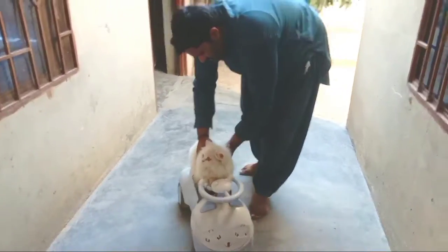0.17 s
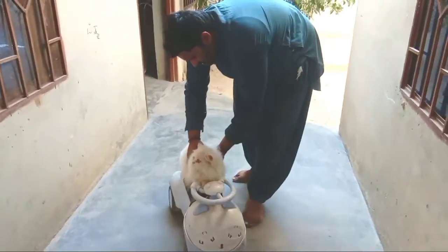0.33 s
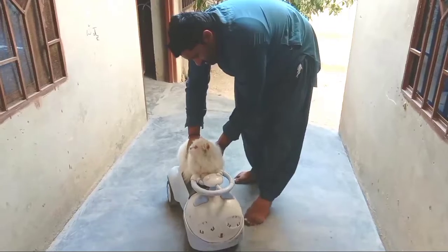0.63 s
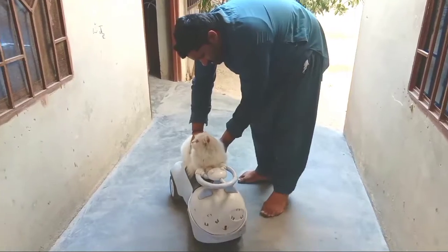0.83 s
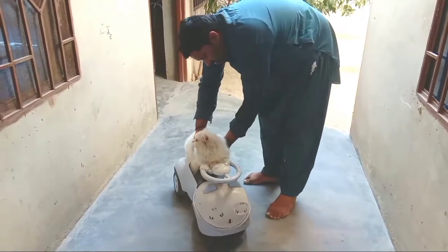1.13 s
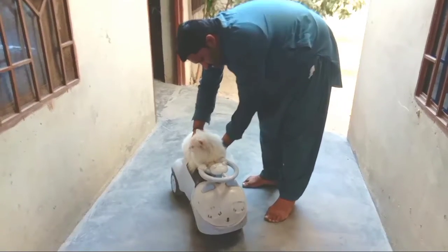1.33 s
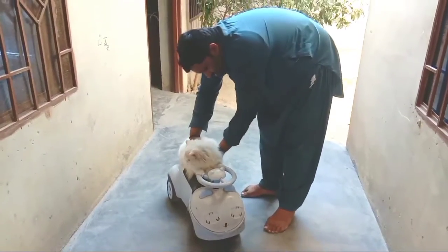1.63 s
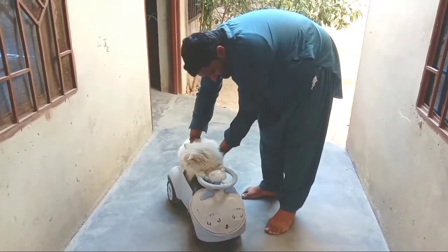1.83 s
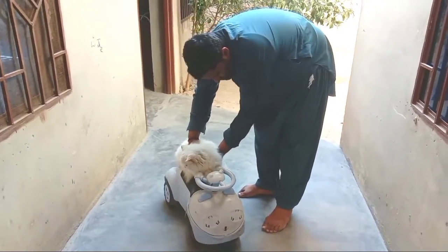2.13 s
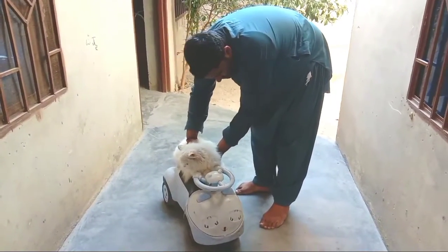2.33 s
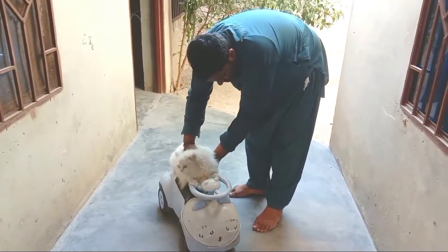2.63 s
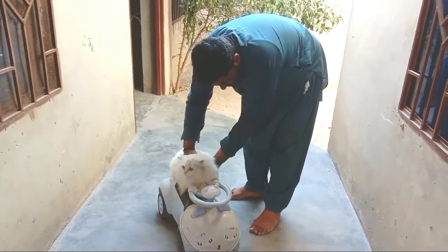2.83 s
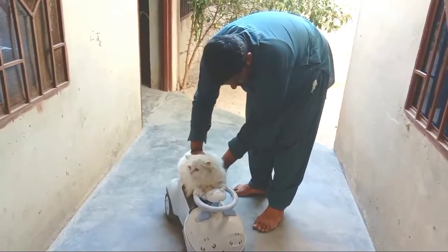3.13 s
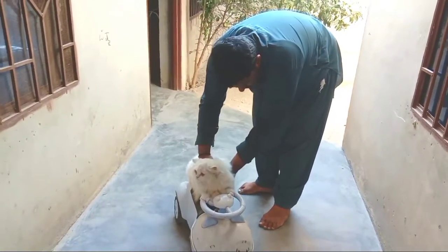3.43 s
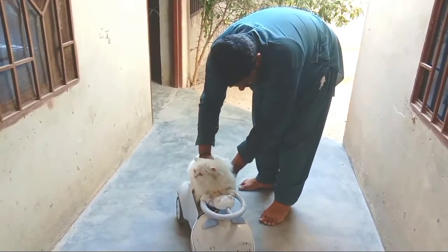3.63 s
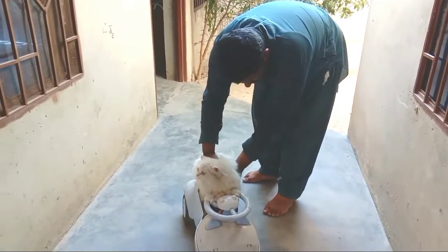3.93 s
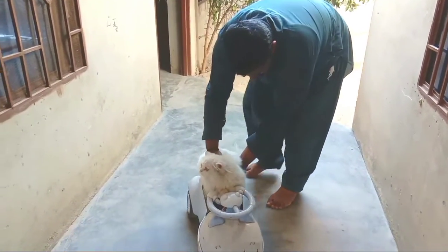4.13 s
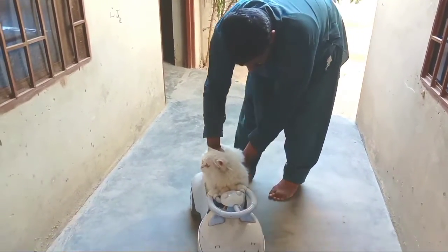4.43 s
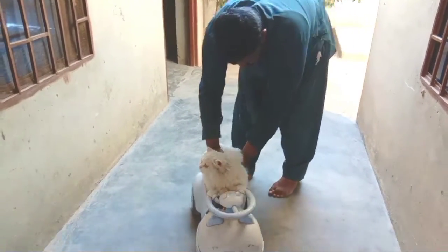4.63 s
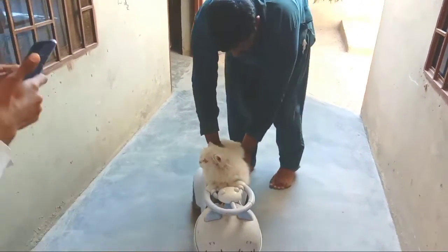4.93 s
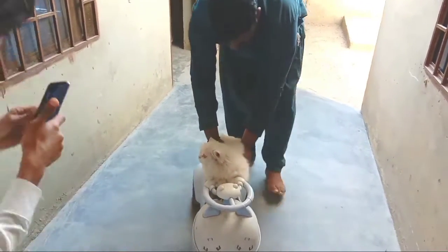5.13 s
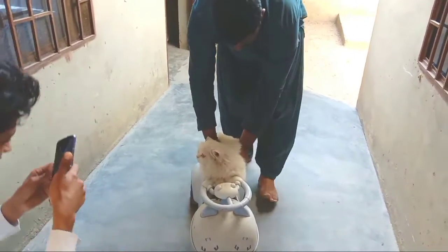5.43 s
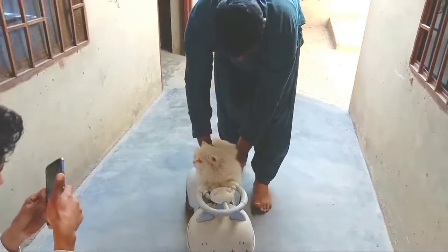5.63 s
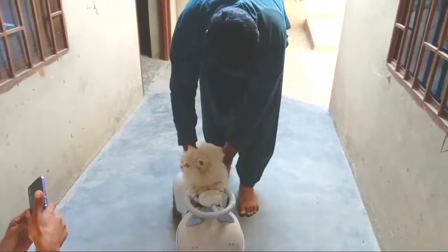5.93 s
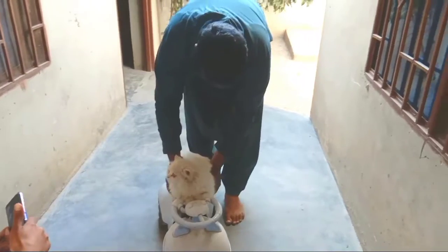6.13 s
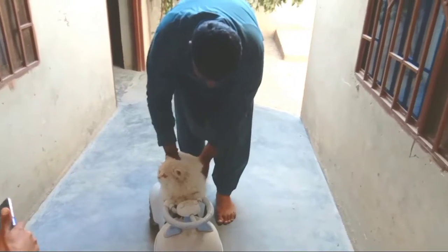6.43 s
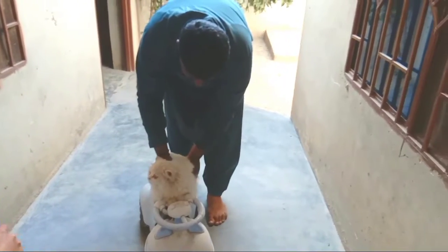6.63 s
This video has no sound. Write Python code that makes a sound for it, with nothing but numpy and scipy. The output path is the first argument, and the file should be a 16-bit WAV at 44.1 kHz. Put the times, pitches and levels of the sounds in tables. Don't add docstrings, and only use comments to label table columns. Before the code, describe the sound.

In a narrow hard-walled corridor, a hollow plastic ride-on toy is nudged over gritty concrete. The first second and a half is loudest, with scrapes, sharp snaps and hollow knocks; it nearly stops around two seconds, then resumes in softer rattling bursts with little axle squeaks. Close to the end a hand bumps and rubs the phone picking up the sound.

```python
import sys
import numpy as np
from scipy import signal
from scipy.io import wavfile
from scipy.ndimage import uniform_filter1d

SR = 44100
rng = np.random.default_rng(int(sys.argv[2]) if len(sys.argv) > 2 else 0)


def linear_from_db(decibels):
    return 10 ** (np.asarray(decibels, float) / 20)


def bounce(signal):
    frames = np.transpose(np.atleast_2d(signal))
    limited = np.clip(frames, -1, 1)
    pcm = np.round(limited * 32767).astype(np.int16)
    wavfile.write(sys.argv[1], SR, pcm)


N = 298557

# frequency in Hz, level in dB per Hz.
AIR_SPECTRUM = [(15, -33), (25, -15), (44, -12), (96, -7.5), (183, -8.5), (434, -14), (923, -19),
                (1180, -14.5), (1270, -6), (1380, -12.5), (3550, -19), (7960, -43), (15600, -41)]
AIR_DB = -69.5

# start in seconds, length in seconds, speed in dB,
# shell ring in dB over speed, weight on the floor in dB over speed.
ROLLS = [(-.1, 0.27, -44.5, -10, -5.5), (0.099, 0.19, -42, -13, -4.5), (0.27, 0.273, -54.5, -12.5, 3.5),
         (0.548, 0.18, -49.5, -9.5, 2), (0.69, 0.38, -48.5, -7.5, -3), (1.034, 0.29, -52.5, -10, 0.5),
         (1.199, 0.28, -54.5, -9, -1), (1.48, 0.11, -56.5, -2.5, -2.5), (1.628, 0.22, -62.5, 3, 7),
         (2.055, 0.26, -85, 14.5, -6.5), (2.393, 0.091, -83, -6, 20.5), (2.621, 0.16, -59.5, -0.5, -7),
         (2.732, 0.22, -62.5, 7, 10), (2.958, 0.28, -59.5, -2, 5), (3.244, 0.29, -58.5, -7, 5),
         (3.5, 0.635, -66, -3.5, 5), (4.08, 0.452, -59, 1, 0), (4.5, 0.3, -58.5, -2, -0.5),
         (4.744, 0.51, -57, -2, -1), (5.061, 0.33, -54.5, -7, -7.5), (5.597, 0.27, -73.5, 5.5, 5),
         (5.902, 0.19, -70, 2.5, 2), (6.009, 0.23, -64.5, 9, 5), (6.457, 0.15, -76, -1, 14)]
# start in seconds, length in seconds, force in dB,
# fine grit in dB over force.
SKIDS = [(0.087, 0.042, -31, -10), (0.123, 0.26, -53, -31), (0.727, 0.026, -45.5, -43),
         (0.81, 0.19, -42.5, -52), (.98, 0.023, -62, -39), (1.106, 0.033, -78, -34),
         (1.201, 0.046, -45.5, -39), (1.329, 0.066, -51, -32), (2.221, 0.013, -70.5, -32),
         (2.53, 0.043, -71.5, -17), (2.726, 0.078, -52, -38), (2.953, 0.15, -56, -11),
         (3.585, 0.02, -68, -38), (4.133, 0.097, -52.5, -30), (4.323, 0.13, -52.5, -13),
         (4.518, 0.11, -56.5, -12), (4.861, 0.16, -56, -14), (5.095, 0.084, -49, -16),
         (5.215, 0.14, -55.5, -11), (5.33, 0.037, -55.5, -9), (5.436, 0.041, -59.5, -29),
         (6.033, 0.093, -55.5, -14), (6.133, 0.066, -77, -30)]
# frequency in Hz, width in Hz, level in dB.
WHEEL_MODES = [(2800, 120, -4), (3560, 120, 7.5), (3960, 65, -1.5), (5250, 250, -25.5), (5850, 270, -15),
               (7100, 140, -24)]
# frequency in Hz, level in dB per Hz.
SCRAPE_SPECTRUM = [(500, -27), (1000, -7), (1600, -6.5), (2200, -1.5), (3600, -1.5), (4550, -6),
                   (5500, -2.5), (6200, -14.5), (6900, -12), (8100, -26), (10000, -24.5), (13400, -40),
                   (15000, -40.5), (15600, -41)]
# frequency in Hz, level in dB per Hz.
RUMBLE_SPECTRUM = [(15, -57.5), (25, -15.5), (118, 0), (184, -3.5), (325, 0.5), (393, -2), (425, -1.5),
                   (717, -13), (1100, -16.5), (1430, -33.5), (2420, -120)]
# frequency in Hz, width in Hz, level in dB.
SHELL_MODES = [(1272, 49, 2), (1250, 26.5, -26.5), (872, 170, -14.5), (620, 270, -21.5)]
# time in seconds, pitch of its main ring in Hz.
SHELL_FLEX = [(0.0, 1190), (0.14, 1280), (0.7, 1220), (0.74, 1322), (1.21, 1243), (1.47, 1300),
              (1.51, 1192), (1.75, 1324), (2.42, 1255), (3.47, 1237), (3.58, 1320), (3.68, 1264),
              (5.14, 1310), (5.23, 1264), (5.77, 1281), (5.98, 1143), (6.04, 1221), (6.3, 1290)]
# start in seconds, length in seconds, level in dB.
HUMS = [(2.77, 0.036, -75), (3.322, 0.18, -55), (4.205, 0.043, -62), (4.295, 0.095, -58.5),
        (4.545, 0.04, -56.5), (4.588, 0.05, -52), (4.687, 0.058, -55), (4.917, 0.056, -58),
        (5.06, 0.09, -65), (5.2, 0.08, -65), (5.335, 0.033, -55.5)]
MOVE_RISE_SHARE, MOVE_FALL_DB_PER_S = 0.23, 400.5
ROLL_FINE_DB = -33.5

# start in seconds, peak in dB, pitch in Hz, t60 in seconds.
SNAPS = [(0.0775, -27, 3520, 0.24), (.2787, -30.5, 3480, 0.11), (.752, -41, 3620, .043),
         (.7864, -41, 2800, 0.93), (.9016, -35, 3960, 0.17), (1.1965, -20, 4810, 0.044),
         (1.3422, -45, 3680, 0.1), (1.3825, -40.5, 3950, 0.075), (1.5738, -48, 2570, 0.036),
         (1.7955, -37.5, 3470, 0.043), (2.4295, -50, 3730, 0.1), (2.6087, -47, 3920, 0.064),
         (2.7593, -30, 3360, 0.041), (2.961, -38, 5700, 0.099), (3.0075, -38.5, 3960, 0.073),
         (3.1352, -35.5, 4520, 0.054), (3.2803, -42.5, 2800, 0.052), (3.69, -49, 2700, 0.053),
         (3.8402, -45.5, 2300, 0.15), (3.878, -47, 3260, 0.038), (4.146, -44.5, 4230, 0.18),
         (4.2513, -40.5, 3470, 0.086), (4.3672, -31.5, 4400, 0.049), (4.3945, -30, 4000, 0.04),
         (4.548, -41.5, 3540, 0.13), (4.7326, -43, 5100, 0.018), (5.0903, -38.5, 3800, 0.033),
         (5.1879, -36, 2800, 0.028), (5.3478, -42, 3160, 0.18), (5.5742, -52, 5000, 0.094)]
# start in seconds, peak in dB, pitch in Hz, t60 in seconds.
TICKS = [(.1013, -40, 3050, 0.14), (.4615, -40.5, 5250, 0.074), (.5028, -45.5, 3420, 0.24),
         (.576, -36, 3710, 0.042), (.7208, -32.5, 4500, 0.059), (1.486, -44, 5250, 0.068),
         (1.5341, -55, 2780, 0.14), (2.969, -38, 3320, 0.045), (2.3366, -47, 3520, 0.037),
         (2.4015, -57, 3500, 0.032), (2.7365, -29.5, 4720, 0.015), (3.062, -44, 2640, 0.26),
         (3.174, -44, 3920, 0.14), (3.228, -49, 2720, 0.17), (3.304, -39, 2800, 0.053),
         (3.344, -39, 5100, 0.17), (3.4403, -38.5, 3920, 0.049), (3.491, -55, 2500, 0.031),
         (3.6456, -50, 2800, 0.095), (4.028, -47, 3330, 0.04), (4.5241, -40, 3730, 0.042),
         (4.775, -45.5, 4740, 0.25), (4.9853, -44, 3120, 0.3), (5.4292, -50, 5470, 0.1),
         (5.449, -43.5, 4360, 0.1), (5.677, -54.5, 3480, 0.14), (6.0726, -46.5, 3400, 0.4),
         (6.1465, -44, 3450, 0.15), (6.1895, -42.5, 3250, 0.15), (1.5204, -49, 5200, 0.025)]
SNAP_FIZZ_DB, TICK_FIZZ_DB = 12.5, -2.5
# start in seconds, peak in dB, pitch in Hz, t60 in seconds.
CRACKS = [(.28, -42, 4530, .05), (.7365, -35.5, 4470, 0.036), (.752, -45, 3700, 0.018),
          (.9016, -24.5, 4840, 0.028), (.995, -34, 5000, 0.024), (2.43, -54, 3700, 0.02),
          (2.9707, -39, 4600, 0.02), (3.0066, -51, 5640, 0.024), (3.024, -42, 4900, 0.036),
          (3.083, -50, 4500, .02), (3.1737, -50, 5140, .02), (3.192, -41.5, 4470, .03),
          (3.4167, -46, 5260, .03), (3.4895, -44, 4870, .03), (4.7326, -52, 4870, 0.037),
          (4.138, -52, 5000, 0.037), (4.1477, -39, 5540, 0.025), (4.165, -42, 5500, .02),
          (4.203, -48.5, 9500, 0.027), (4.222, -40.5, 4900, .03), (4.3488, -41, 2770, 0.03),
          (4.372, -35.5, 6300, 0.037), (4.398, -37, 5500, 0.013), (4.436, -49, 8000, .02),
          (4.576, -54, 9400, 0.034), (4.987, -54, 4950, .02), (5.147, -46, 3900, 0.024),
          (5.19, -52, 8900, 0.021), (.0775, -31, 3600, .03), (.4615, -31.5, 5250, 0.015),
          (1.3226, -45, 2530, 0.035), (1.574, -51, 3830, 0.036), (1.6, -46, 3620, 0.058),
          (1.6942, -49.5, 5140, 0.099), (1.8394, -52, 3360, 0.029), (2.4015, -49.5, 3630, 0.019),
          (3.281, -52.5, 4940, 0.027), (3.7564, -61, 5400, 0.064), (3.782, -56, 5140, .06),
          (3.858, -52, 5200, .08), (3.885, -49, 4300, 0.091), (4.0622, -49.5, 3300, 0.055),
          (4.075, -61, 5000, 0.043), (5.0903, -48, 5500, 0.017), (5.352, -44, 3470, 0.027),
          (6.095, -37.5, 2730, 0.059), (6.24, -45, 3230, 0.045), (.095, -37, 1320, 0.13)]
# frequency in Hz, t60 in seconds.
WALL_DECAY = [(250, 0.2), (700, 0.33), (1800, 0.26), (4600, 0.17), (12000, 0.097)]
# start in seconds, peak in dB, pitch in Hz, t60 in seconds.
RATTLE = [(0.1022, -3, 3390, 0.018), (0.1084, -4.5, 3125, 0.024), (0.1124, -14.5, 2910, 0.036),
          (0.1174, -12, 3640, 0.049), (0.1234, -31, 3720, 0.03), (0.1304, -26.5, 3290, 0.017),
          (0.1364, -21.5, 3700, 0.01), (2.7605, -27, 4550, 0.011), (2.695, -39, 5400, .015),
          (1.1975, -16, 4020, .012), (3.008, -31, 5430, .015), (4.7326, -37, 5250, 0.022),
          (4.985, -33, 3250, .02), (4.999, -32, 4000, .01), (5.0906, -31, 3840, 0.018),
          (5.103, -31, 3960, .015), (5.1475, -25, 3550, 0.011), (4.6426, -40, 3570, .02),
          (4.8945, -36, 3130, .03)]
# start in seconds, peak in dB, pitch in Hz, t60 in seconds.
KNOCKS = [(0.176, -21, 125, 0.088), (0.21, -28, 120, 0.1), (0.239, -27, 129.7, 0.27),
          (0.58, -31, 332, 0.077), (0.671, -40.5, 197, 0.22), (1.207, -22, 343, 0.072),
          (1.249, -29, 322, 0.071), (1.279, -21.5, 315, 0.025), (1.335, -32.5, 103, 0.13),
          (1.35, -35, 883, 0.054), (1.41, -39.5, 686, 0.082), (1.679, -38.5, 193, 0.11),
          (1.805, -34.5, 215, 0.091), (1.825, -33, 155, 0.11), (1.994, -37.5, 396, 0.028),
          (2.667, -39.5, 250, 0.17), (2.772, -25, 574, 0.042), (3.099, -38, 305, 0.061),
          (3.11, -42.5, 580, 0.15), (4.14, -49, 331, 0.22), (4.36, -44.5, 680, 0.12),
          (3.186, -30.5, 313, 0.068), (3.347, -63, 336, 0.1), (3.517, -37, 249, 0.095),
          (3.75, -42.5, 150, 0.16), (5.17, -39.5, 433, 0.089), (5.43, -50, 119, 0.16),
          (6.069, -38.5, 582, 0.097), (6.251, -24, 136, 0.021)]
# start in seconds, peak in dB, pitch in Hz, t60 in seconds.
RINGS = [(1.521, -40.5, 1190, 0.1), (1.666, -44.5, 1090, 0.13), (3.061, -33.5, 2830, 0.09),
         (3.099, -37.5, 1766, 0.17), (3.335, -33.5, 1283, 0.15), (1.797, -31, 3570, 0.044),
         (1.555, -45, 1210, 0.053), (1.685, -47, 1300, 0.064), (3.335, -40, 1500, 0.088),
         (1.797, -40, 3600, 0.056), (4.7, -48, 2200, 0.14), (5.959, -50, 1041, 0.2),
         (6.059, -40, 2090, 0.21)]
# start in seconds, peak in dB, pitch in Hz, t60
# in seconds.
MORE_RINGS = [(1.571, -39, 2520, .045), (1.571, -40, 4000, .05), (1.527, -41, 3700, .05), (1.53, -42, 2760, .07),
              (1.795, -39, 2550, .045), (1.795, -37, 3130, .05), (1.836, -42, 3400, .04), (1.71, -49, 2600, .06),
              (2.29, -60, 1720, .2), (1.655, -45, 1680, .1), (1.8, -46, 1830, .15)]

# start in seconds, length in seconds, level in dB, pitch in Hz.
SQUEAKS = [(0.105, 0.021, -28, 2187), (0.157, 0.14, -49, 2003), (0.644, 0.046, -48.5, 1833),
           (0.826, 0.13, -45.5, 2034), (1.193, 0.016, -36.5, 1750), (1.33, 0.093, -51.5, 1960),
           (1.57, 0.052, -54, 1464), (1.64, 0.062, -51, 1650), (1.72, 0.15, -53.5, 1836),
           (2.0, 0.44, -72, 1750), (2.734, 0.18, -48, 1886), (3.082, 0.034, -55, 1738),
           (3.193, 0.06, -51.5, 2167), (3.329, 0.19, -48.5, 1837), (3.94, 0.13, -53.5, 1860),
           (4.07, .07, -55, 1967), (4.556, 0.22, -49, 1790), (4.899, 0.088, -55, 2160),
           (5.126, 0.056, -57, 2054), (5.321, 0.039, -53, 2140), (5.77, 0.079, -59.5, 2128),
           (5.9, .1, -53, 2070), (6.0, 0.088, -44.5, 2000), (6.1, 0.044, -60, 1760),
           (6.17, 0.028, -50, 1760)]
# start in seconds, length in seconds, level in dB, pitch in Hz.
WHINES = [
    (1.66, 0.081, -58.5, 2800),
    (2.06, 0.11, -69, 3440),
    (4.88, 0.13, -52, 3850),
    (5.0, 0.089, -53, 3950),
    (5.09, 0.077, -62, 3950),
    (5.95, 0.24, -58.5, 3980),
    (6.06, 0.14, -47.5, 3600),
    (6.14, .08, -59, 3670),
]
SING_RISE_SHARE, SING_FALL_DB_PER_S = 0.36, 203.5

# start in seconds, peak in dB, pitch in Hz, t60 in seconds.
FINGERS = [(6.582, -14, 1256, 0.052), (6.635, -33, 1200, 0.18), (6.48, -58, 249, 0.13),
           (6.525, -40, 170, .2), (6.64, -34, 177, 0.087), (6.655, -23, 656, .04), (6.668, -22, 250, 0.066),
           (6.678, -33, 396, .04), (6.715, -44, 590, .05), (6.727, -34, 890, .05), (6.733, -36, 620, 0.052),
           (6.735, -44, 1250, 0.034), (6.725, -50.5, 2180, 0.14), (6.745, -44, 180, .1)]
# time in seconds, hand pressure in dB.
RUB_PRESSURE = [
    (6.556, -60),
    (6.568, -29),
    (6.58, -23.5),
    (6.592, -30.5),
    (6.606, -41.5),
    (6.658, -31.5),
    (6.695, -48.5),
    (6.74, -52),
    (6.77, -72),
]
# frequency in Hz, level in dB per Hz.
CASING_SPECTRUM = [(30, -22), (123, -4.5), (658, -10), (949, -15), (1200, -6), (1520, -17), (5480, -24),
                   (7000, -39), (8100, -44.5), (10000, -40.5), (13300, -47), (15000, -44.5), (15600, -35.5)]
# start in seconds, peak in dB, push length in seconds, tick size and sign.
BUMPS = [
    (6.5697, -9.5, 0.0028, -1.5),
    (6.5873, -24, 0.00084, 4),
]


def read(points, hz):
    f, value = np.transpose(points)
    return np.interp(np.log(hz + 1), np.log(f + 1), value)


def evened(x):
    return x / np.sqrt(np.mean(x ** 2) + 1e-20)


def add(mix, s, sound):
    part = mix[round(s * SR):][:len(sound)]
    part += sound[:len(part)]


def colour(x, points):
    gain_db = read(points, abs(np.fft.fftfreq(8192, 1 / SR)))
    log_gain = np.log(linear_from_db(np.maximum(gain_db, -100)))
    taps = np.fft.ifft(np.exp(np.conj(signal.hilbert(log_gain)))).real[:4096]
    return signal.oaconvolve(x, taps)[:len(x)]


def top_octave(x):
    return signal.sosfilt(signal.butter(4, 7800, "high", fs=SR, output="sos"), x)


def brighter(x, db):
    return x + (linear_from_db(db) - 1) * top_octave(x)


def resonate(x, hz, width):
    turn = np.exp(2j * np.pi * np.cumsum(hz * np.ones(len(x))) / SR)
    r = np.exp(-np.pi * width / SR)
    return 2 * (turn * signal.lfilter([1 - r], [1, -r], x / turn)).real


def body(x, modes, bend=1):
    out = 0
    for k, (hz, width, db) in enumerate(modes):
        out = out + (-1) ** k * linear_from_db(db) * resonate(x, hz * bend, width)
    return out


def patchy(x, depth_db, wide_hz, long_s):
    z = signal.stft(x, nperseg=512, noverlap=384)[2]
    field = rng.standard_normal(z.shape)
    for _ in range(2):
        field = uniform_filter1d(field, max(1, round(wide_hz * 512 / SR)), axis=0)
        field = uniform_filter1d(field, max(1, round(long_s * SR / 128)), axis=1)
    z = z * linear_from_db(depth_db * evened(field))
    return signal.istft(z, nperseg=512, noverlap=384)[1][:len(x)]


def grit(per_s, spread_db):
    hit = rng.random(N) < per_s / SR
    size = linear_from_db(spread_db * np.minimum(rng.exponential(1, N), 5))
    return evened(hit * rng.standard_normal(N) * size)


def blunt_grit(spread_db):
    soft = signal.butter(2, [450, 2300], "band", fs=SR, output="sos")
    return signal.sosfilt(soft, grit(3000, spread_db))


def moves(rows, db, rise=MOVE_RISE_SHARE, fall_db=MOVE_FALL_DB_PER_S):
    t = np.arange(0, N + 64, 64) / SR
    start, length = np.transpose(rows)[:2, :, None]
    swell = np.sin(np.pi / 2 * np.clip((t - start) / (rise * length), 0, 1)) ** 2
    fall = fall_db * np.maximum(t - start - length, 0)
    power = (swell * linear_from_db(db[:, None] - fall)) ** 2
    return np.interp(np.arange(N) / SR, t, np.sqrt(power.sum(axis=0)))


def air():
    noise = colour(rng.standard_normal(N), AIR_SPECTRUM)
    return linear_from_db(AIR_DB) * patchy(evened(noise), 0.56, 300, 0.029)


def wheel_contact():
    return patchy(grit(7000, 1.5), 1.2, 7300, .01)


def wheel_scrape(contact):
    speed_db = np.transpose(ROLLS)[2]
    force_db, fine_db = np.transpose(SKIDS)[2:]
    raw = colour(contact + 1.13 * body(contact, WHEEL_MODES), SCRAPE_SPECTRUM)
    fine = patchy(evened(top_octave(raw)), 2, 400, .04)
    scrape = patchy(evened(brighter(raw, -30)), 2.7, 400, .06)
    speed = moves(ROLLS, speed_db - 2.0)
    scrape_level = np.hypot(speed, moves(SKIDS, force_db))
    fine_level = np.hypot(linear_from_db(ROLL_FINE_DB) * speed, moves(SKIDS, force_db + fine_db))
    return scrape_level * scrape + fine_level * fine


def floor_rumble():
    speed_db, _, weight_db = np.transpose(ROLLS)[2:]
    rumble = patchy(evened(colour(grit(1500, 1.5), RUMBLE_SPECTRUM)), 3.56, 170, 0.039)
    return moves(ROLLS, speed_db + weight_db - 7.0) * rumble


def shell_ring():
    speed_db, ring_db, _ = np.transpose(ROLLS)[2:]
    flex = np.interp(np.arange(N) / SR, *np.transpose(SHELL_FLEX)) / SHELL_MODES[0][0]
    hum = evened(body(blunt_grit(0.81), SHELL_MODES, flex))
    shell = patchy(hum, 2.7, 250, 0.1)
    binding = moves(HUMS, np.transpose(HUMS)[2] - 1.5) * hum
    return moves(ROLLS, speed_db + ring_db - 1.0) * shell + binding


def clicks(rows, fizz_db):
    out, t = np.zeros(N), np.arange(6000) / SR
    small = signal.butter(2, 2100, "high", fs=SR, output="sos")
    noise = colour(rng.standard_normal(len(rows) * len(t)), SCRAPE_SPECTRUM)
    noise = signal.sosfilt(small, noise).reshape(-1, len(t))
    fizz = top_octave(noise) * (1 - np.exp(-t / 0.0065))
    chance = rng.random((len(rows), 4))
    for (s, db, hz, t60), crackle, top, (near, *more) in zip(rows, brighter(noise, -28.5), fizz, chance):
        dying = linear_from_db(-60 * t / max(t60, .01))
        snap = crackle * dying * (1 - np.exp(-t / 0.00022))
        side_modes = sum(resonate(snap, 2600 + 3600 * u, 250) for u in more)
        snap = snap + 4.6 * resonate(snap, hz, 200) + 0.37 * side_modes
        snap = snap + linear_from_db(fizz_db + 12.0 + 2.4 * (near - 1.5)) * top * dying
        lag = round(SR / (450 + 350 * near))
        snap = snap + .6 * np.pad(snap, (lag, 0))[:len(t)]
        first_crack = crackle * linear_from_db(-60 * t / 0.0043) * (1 - np.exp(-t / 0.001))
        snap = snap + 4.8 * first_crack
        add(out, s, linear_from_db(db) * snap / abs(snap).max())
    return out


def cracks(rows):
    out, t = np.zeros(N), np.arange(2000) / SR
    for (s, db, hz, t60), crackle in zip(rows, rng.standard_normal((len(rows), len(t)))):
        snap = crackle * linear_from_db(-60 * t / max(t60, .005)) * (1 - np.exp(-t / 0.00023))
        for share in (.45, .7, .9):
            snap = resonate(snap, hz, share * hz)
        add(out, s, linear_from_db(db) * snap / abs(snap).max())
    return out


def corridor(x):
    taps = np.zeros(SR // 2)
    at = np.arange(130, len(taps) - 20, 20)
    taps[at + rng.integers(0, 20, len(at))] = rng.choice([-1., 1.], len(at))
    hz, t, z = signal.stft(taps, SR, nperseg=256)
    decay = linear_from_db(-60 * t / read(WALL_DECAY, hz)[:, None])
    tail = signal.istft(z * decay, SR, nperseg=256)[1]
    return signal.fftconvolve(x, tail / np.linalg.norm(tail))[:N]


def knocks(rows, spread):
    out, t = np.zeros(N), np.arange(9000) / SR
    for s, db, hz, t60 in rows:
        pair = np.sin(2 * np.pi * hz * t) + 0.42 * np.sin(2 * np.pi * hz * (1 + spread) * t)
        dying = linear_from_db(db - 8.5 - 60 * t / max(t60, .01))
        add(out, s, dying * pair * (1 - np.exp(-t * hz / 1.8)))
    return out


def singing(rows, drive, narrow, wide):
    start, length, db, hz = np.transpose(rows)
    pitch_hz = np.interp(np.arange(N) / SR, start + length / 2, hz)
    tone = resonate(resonate(drive, pitch_hz, narrow), pitch_hz, wide)
    tone = patchy(evened(tone), 1.3, 400, .025)
    return moves(rows, db - 8.0, SING_RISE_SHARE, SING_FALL_DB_PER_S) * tone


def axle_and_rim(contact):
    return singing(SQUEAKS, blunt_grit(0.91), 220, 450) + singing(WHINES, contact, 310, 440)


def hand():
    s, db = np.transpose([(0, -120), (6.545, -120)] + list(RUB_PRESSURE))
    rub_db = np.interp(np.arange(N) / SR, s, db, right=db[-1] - 60)
    out = linear_from_db(rub_db) * brighter(evened(colour(grit(15000, 1.2), CASING_SPECTRUM)), -1.5)
    t = np.arange(4000) / SR
    for s, db, length, tick_size in BUMPS:
        swing = np.sin(2 * np.pi * 115 * t) * np.exp(-t / (1.25 * length))
        ring = 0.067 * np.sin(2 * np.pi * 1200 * t) * linear_from_db(-60 * t / 0.087)
        tick = tick_size * np.exp(-((t - .0003) / 0.0002) ** 2)
        add(out, s, linear_from_db(db) * (swing + ring + tick))
    return signal.sosfilt(signal.butter(2, 45, "high", fs=SR, output="sos"), out)


def scene():
    contact = wheel_contact()
    rolling = wheel_scrape(contact) + floor_rumble() + shell_ring() + axle_and_rim(contact)
    hits = clicks(SNAPS, SNAP_FIZZ_DB) + clicks(TICKS, TICK_FIZZ_DB) + cracks(CRACKS)
    hits = hits + knocks(RATTLE, .12) + knocks(KNOCKS, 0.15) + knocks(list(RINGS) + list(MORE_RINGS), 0.032)
    touch = hand() + knocks(FINGERS, 0.23)
    return (air() + rolling + hits + linear_from_db(-5.0) * corridor(hits) + touch)[None]


def band_limit(x):
    return signal.sosfilt(signal.butter(12, 16600, fs=SR, output="sos"), x)


def record(dry):
    thin = signal.sosfilt(signal.butter(3, 52, "high", fs=SR, output="sos"), dry)
    thin = thin - .5 * resonate(thin[0], 8080, 1200)
    edge = signal.firwin(401, 15600, window=("kaiser", 8), fs=SR)
    return band_limit(signal.oaconvolve(thin, edge[None], "same"))


dry = scene()
out = record(dry)
bounce(out)
```